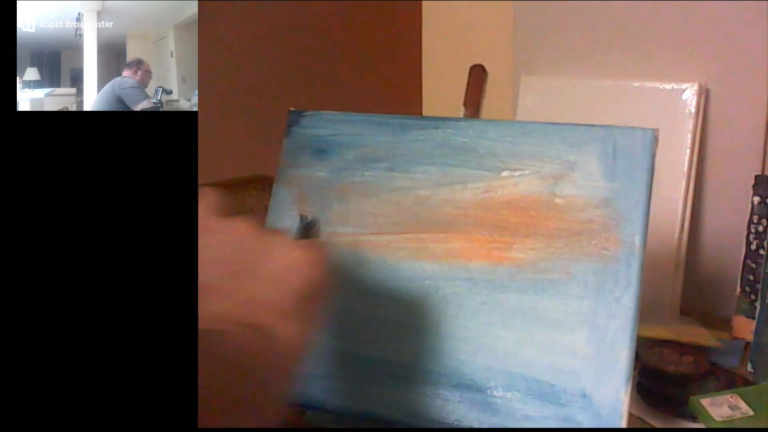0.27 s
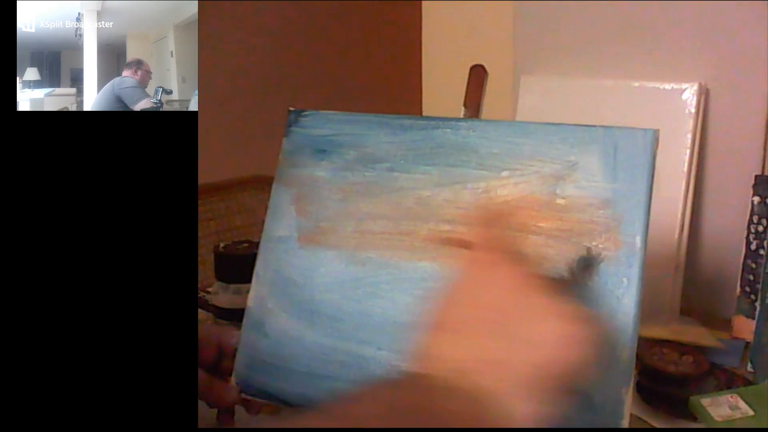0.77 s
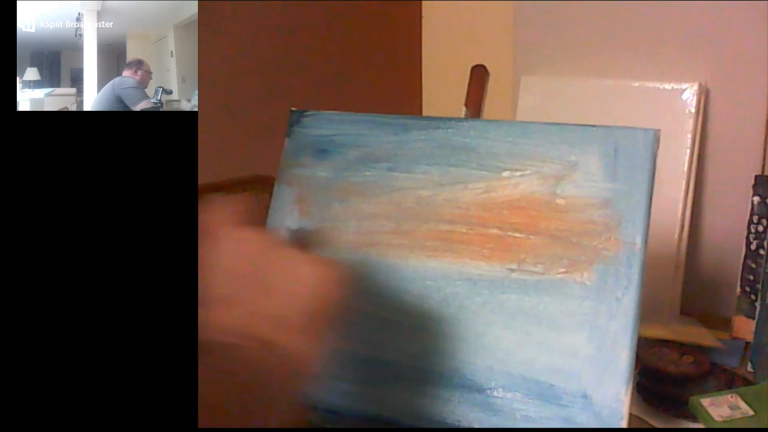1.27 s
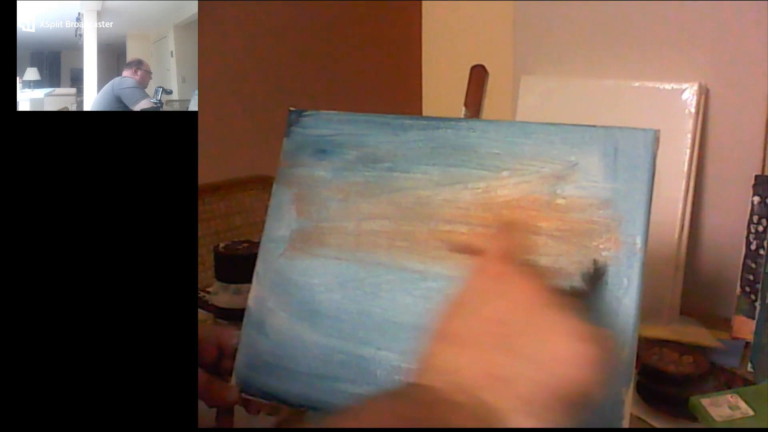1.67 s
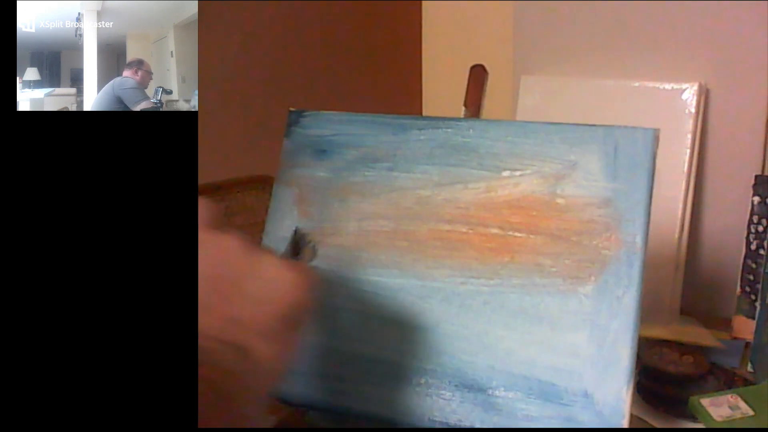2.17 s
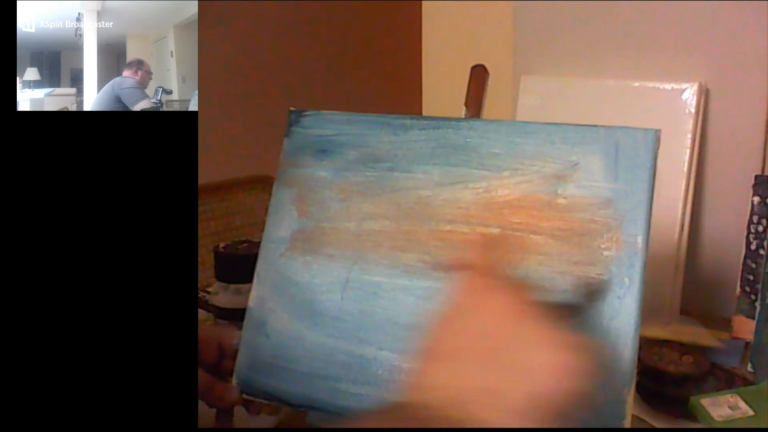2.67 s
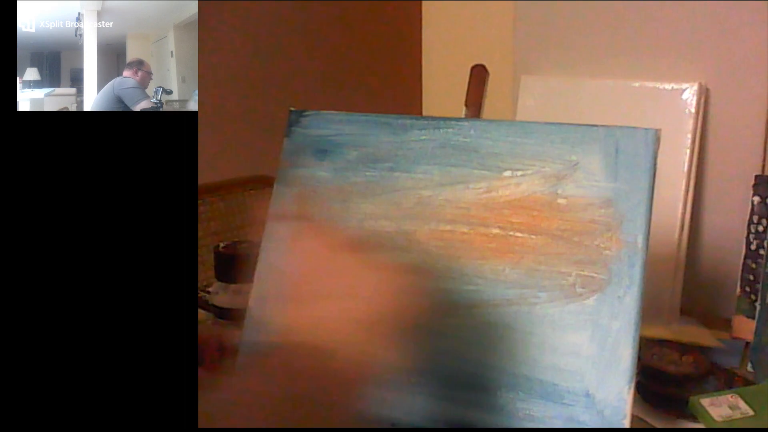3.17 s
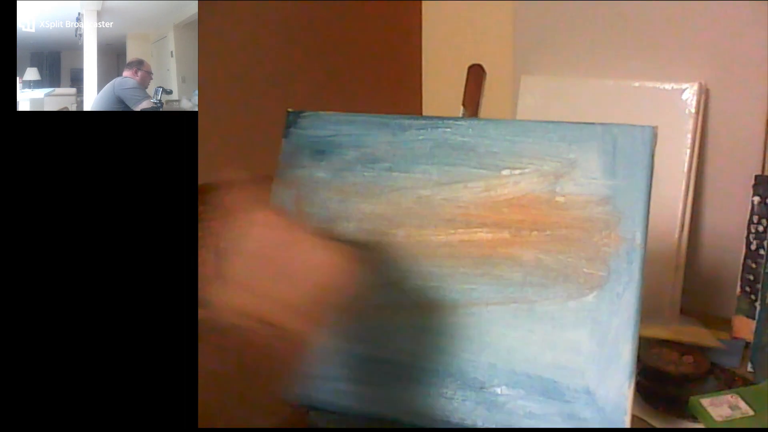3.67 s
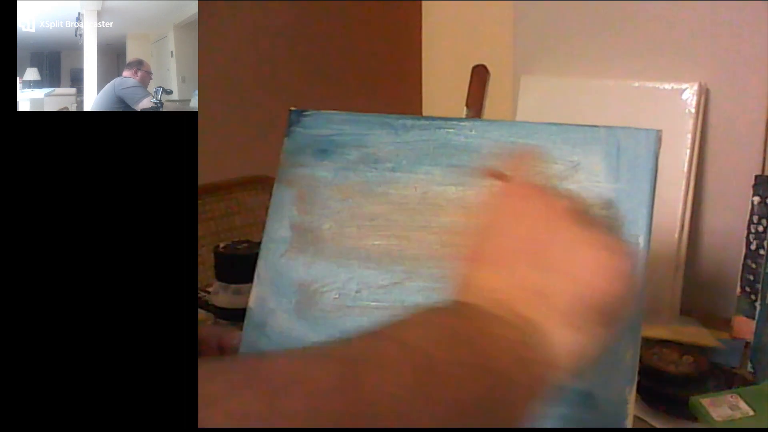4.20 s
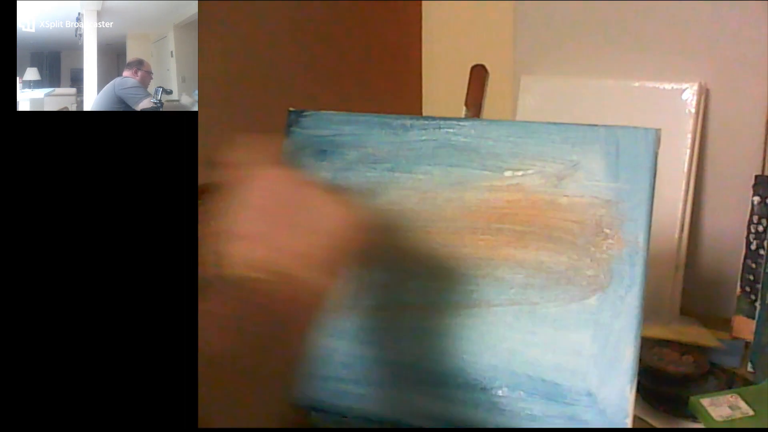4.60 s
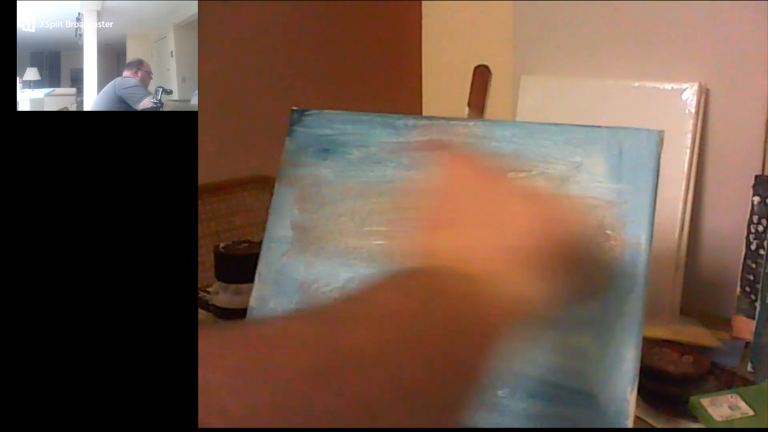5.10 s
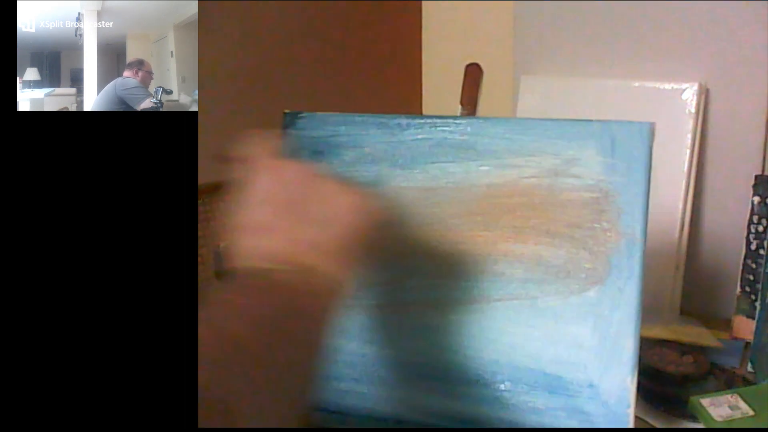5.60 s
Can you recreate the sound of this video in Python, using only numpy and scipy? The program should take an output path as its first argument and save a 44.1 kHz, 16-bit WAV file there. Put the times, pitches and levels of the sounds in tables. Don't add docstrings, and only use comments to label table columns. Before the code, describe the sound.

Sixteen or so uneven bristly swishes follow one another for six seconds, stronger and weaker strokes roughly alternating. Crackly bristle ticks rasp the weave, while the canvas resonates quietly like a slack drum. Small bumps open the scene, a cluster of taps and brief dabs comes midway, and later strokes start with light clicks. The pickup is close, with little bass, low hiss, a small dry room and momentary watery thinning.

```python
import sys
import numpy as np
from scipy import signal
from scipy.fft import rfft, irfft, next_fast_len
from scipy.io import wavfile
from scipy.ndimage import uniform_filter1d, map_coordinates

SR = 44100
rng = np.random.default_rng(int(sys.argv[2]) if len(sys.argv) > 2 else 0)


def wav_out(sig):
    wavfile.write(sys.argv[1], SR, np.round(np.clip(np.atleast_2d(sig).T, -1, 1) * 32767).astype(np.int16))


def gain_from_db(level_db):
    decades = np.asarray(level_db, float) / 20
    return 10 ** decades


N = 257984

# (centre [Hz], width [Hz], level [dB])
WEAVE_MODES = [(773, 76, -4), (866, 72, -1.5), (1056, 160, -5.5), (1199, 30.3, 0), (1450, 270, -3)]
# (centre [Hz], width [Hz], level [dB])
THREAD_MODES = [(1783, 247, -7), (2533, 207, -1.5), (2697, 205, -0.5), (3340, 384, -1)]
# (splayed tips [dB], drag on weave [dB], load on drum [dB], shove of frame [dB])
HAND_GRIP = [(1, 0, 0, 6), (4, 5, 7, 5), (1, 1, -3, -8), (1, 3, 9, 7), (8, -4, 0, 8), (1, -1, 0, -6),
             (0, 1, 5, 8), (-8, 12, 15, 18), (1, 1, 2, 5), (6, 1, 0, -5), (1, 2, 0, -8), (-2, 1, -4, -4),
             (-3, 2, -10, -8), (-3, 0, -4, 5), (-2, -1, -8, 2), (-8, -4, -2, 1)]


def unit(x):
    return x / np.sqrt(np.mean(x ** 2) + 1e-20)


def along(points, hz):
    f, v = np.transpose(points)
    return np.interp(np.log(hz + 1), np.log(f + 1), v)


def wobble(rate_hz):
    knots = rng.standard_normal(int(N * rate_hz / SR) + 4)
    return map_coordinates(knots, [np.arange(N) * rate_hz / SR])


def filtered(x, response):
    size = next_fast_len(N + SR // 2)
    return irfft(rfft(x, size) * response(np.fft.rfftfreq(size, 1 / SR)), size)[:N]


def modes(table):
    def response(f):
        total = 0
        for k, (centre, width, db) in enumerate(table):
            total = total + (-1) ** k * gain_from_db(db) * 1j * f * width / (centre ** 2 - f * f + 1j * f * width)
        return total
    return response


def banded_modes(table, centre_hz, width_hz):
    return lambda hz: modes(table)(hz) * modes([(centre_hz, width_hz, 0)])(hz)


def patchy(x, depth_db, bins, frames):
    z = signal.stft(x, nperseg=512)[2]
    field = uniform_filter1d(rng.standard_normal(z.shape), bins, 0)
    field = uniform_filter1d(field, frames, 1)
    return unit(signal.istft(z * gain_from_db(depth_db * unit(field)), nperseg=512)[1][:N])


def catches(per_s, spread_db, share):
    when, sign, size = rng.random((3, N))
    ticks = (when < per_s / SR) * np.sign(sign - .5) * gain_from_db(-spread_db * np.log(1 - size))
    return np.sqrt(share) * unit(ticks) + np.sqrt(1 - share) * rng.standard_normal(N)


def motion(layer, grip_db=0, rest_db=-60):
    # (bristles grip [s], time to fastest [s], fastest to lift-off [s], peak sizzle [dB])
    strokes = [(.175, .09, .17, -27), (.595, .12, .175, -22), (1.1, .17, .11, -30), (1.565, .12, .15, -21),
               (1.987, .02, .02, -48), (2.075, .19, .065, -27), (2.467, .115, .14, -24),
               (2.8, .06, .015, -42), (2.893, .15, .12, -23), (3.325, .03, .05, -34),
               (3.405, .04, .11, -27), (3.757, .18, .105, -21), (4.19, .19, .08, -28),
               (4.678, .25, .09, -21), (5.115, .15, .17, -28), (5.65, .14, .1, -24)]
    # (level [dB], share of swell, lead [s], lag [s], attack [dB/s], release [dB/s])
    follow = dict(sizzle=(0.1, 1.01, .001, .001, 900, 500), tips=(-16, .6, .003, -.005, 800, 600),
              threads=(-8, .85, .003, .008, 900, 500), weave=(-10, .6, .012, .02, 700, 450),
              drum=(-17, .45, .015, .03, 500, 500), sway=(-27, .3, .03, .04, 400, 400))
    # (time [s], sizzle level [dB])
    resting = [(0, -55), (.03, -66), (.15, -53), (.44, -60), (.53, -70), (.97, -62), (1.06, -54),
               (1.47, -53), (1.93, -72), (2.04, -53), (2.4, -64), (2.77, -62), (3.22, -53), (3.68, -58),
               (4.13, -64), (4.6, -72), (5.07, -37), (5.53, -57)]
    land_db, lift_db, least_swell_db = -34, -38, 3.5
    rise_bend, fall_bend = 1.6, 1.9

    layer_db, share, lead_s, lag_s, attack, release = follow[layer]
    start, rise, fall, peak = np.transpose(strokes)[..., None]
    t = np.arange(0, N / SR, .002)
    fastest = start + rise
    rise = rise + lead_s
    fall = np.maximum(fall + lag_s, .005)
    land = np.minimum(land_db, peak - least_swell_db)
    lift = np.minimum(lift_db, peak - least_swell_db)
    before = np.maximum(fastest - t, 0)
    after = np.maximum(t - fastest, 0)
    dome = peak - (peak - land) * np.minimum(before / rise, 1) ** rise_bend
    dome = dome - (peak - lift) * np.minimum(after / fall, 1) ** fall_bend
    edges = attack * np.maximum(before - rise, 0) + release * np.maximum(after - fall, 0)
    level = land + share * (dome - land) - edges + layer_db + np.reshape(grip_db, (-1, 1))
    rest = np.interp(t, *np.transpose(resting)) + rest_db
    power = np.sum(gain_from_db(2 * level), axis=0) + gain_from_db(2 * rest)
    return np.interp(np.arange(N) / SR, t, np.sqrt(power))


def room():
    # (frequency [Hz], density [dB/Hz])
    hiss = [(40, -38), (100, -28), (150, 1), (230, -13), (330, -12), (540, -15), (1140, -16.5),
            (1690, -16.5), (2290, -19), (3500, -12), (4720, -7), (6000, -17.5), (8380, -35), (15600, -42)]
    return gain_from_db(-63) * unit(filtered(rng.standard_normal(N), lambda hz: gain_from_db(along(hiss, hz))))


def walls(x):
    # (frequency [Hz], t60 [s])
    decay = [(200, 0.16), (2000, 0.15), (5000, 0.21), (12000, 0.079)]
    hz, t, z = signal.stft(rng.standard_normal(SR // 2), SR, nperseg=256)
    tail = signal.istft(z * gain_from_db(-60 * t / along(decay, hz)[:, None]), SR, nperseg=256)[1]
    delayed = np.pad(x, (300, 0))
    return signal.fftconvolve(delayed, tail / np.linalg.norm(tail))[:N]


def knocks():
    # (time [s], peak level [dB], pitch [Hz], t60 [s])
    landings = [(0.005, -46, 400, 0.057), (0.057, -43, 252, 0.087), (0.079, -26.5, 215, 0.053),
                (0.111, -25.5, 229, 0.042), (1.599, -40.5, 371, 0.13), (2.044, -38.5, 440, 0.077),
                (2.782, -46, 168, 0.091), (2.854, -31, 220, 0.038), (3.072, -40.5, 350, 0.055),
                (3.187, -41, 170, 0.05), (3.238, -41, 185, 0.046), (4.074, -46, 248, 0.062),
                (4.586, -43, 227, 0.06), (4.85, -34, 350, 0.043), (5.128, -40, 209, 0.058)]
    out, t = np.zeros(N + SR), np.arange(SR // 5) / SR
    for s, db, hz, t60 in landings:
        ring = np.sin(2 * np.pi * hz * t) + 0.3 * np.sin(2 * np.pi * 1.82 * hz * t)
        soft_onset = 1 - np.exp(-t / 0.0035)
        out[round(s * SR):][:len(t)] += gain_from_db(db + 5.5 - 60 * t / t60) * ring * soft_onset
    return out[:N]


def taps():
    # (time [s], peak level [dB], top level [dB], ringing [Hz], t60 [s])
    ticks = [(0.06, -51, -8, 980, 0.036), (0.077, -49, -4, 1490, 0.033), (0.11, -48, 0, 894, 0.04),
             (1.99, -46, 2, 970, 0.058), (2.046, -32, -5, 950, 0.054), (2.473, -33.5, 13, 826, 0.073),
             (2.789, -35.5, -8, 950, 0.073), (2.831, -32.5, -21, 1000, 0.047),
             (2.856, -21.5, -25, 967, 0.053), (2.897, -26.5, -14, 995, 0.04), (3.761, -34, -9, 1490, 0.04),
             (4.194, -30, -2, 1540, 0.079), (4.576, -52, 11, 1410, 0.03), (4.636, -29, -48, 1240, 0.04),
             (4.653, -31.5, -8, 960, 0.02), (4.684, -29, 3, 840, 0.032), (5.049, -38.5, 14, 866, 0.089),
             (5.121, -42, -7, 1500, 0.044), (5.598, -40.5, -6, 1510, 0.051),
             (5.649, -30.5, -8, 1450, 0.045)]
    body, ring, top = np.zeros((3, N + SR))
    t = np.arange(SR // 10) / SR
    for s, db, top_db, hz, t60 in ticks:
        burst = rng.standard_normal(len(t))
        span = slice(round(s * SR), round(s * SR) + len(t))
        body[span] += gain_from_db(db + 15 - 60 * t / 0.0036) * burst
        tone = np.sin(2 * np.pi * hz * t) * (1 - np.exp(-t / 0.0016))
        ring[span] += gain_from_db(db - 3 - 60 * t / t60) * tone
        top[span] += gain_from_db(db + top_db + 1.5 - 60 * t / t60) * burst * (1 - np.exp(-t / .0006))
    spit = filtered(top[:N], lambda hz: modes([(4800, 2600, 0)])(hz) ** 3)

    def soft(hz):
        return modes(WEAVE_MODES + THREAD_MODES)(hz) / (1 + 1j * hz / 4500) ** 2
    return filtered(body[:N], soft) + ring[:N] + spit


def canvas():
    # (centre [Hz], width [Hz], level [dB])
    sway_modes = [(75, 48, -19), (157.5, 40, -10), (237.2, 29.6, -3)]
    # (centre [Hz], width [Hz], level [dB])
    drum_modes = [(362.5, 47, -2), (427, 50.4, -2), (588, 62, -2)]
    load_db, shove_db = np.transpose(HAND_GRIP)[2:]
    shoves = catches(per_s=70, spread_db=3.5, share=0.46) * gain_from_db(0.83 * wobble(25))
    sway = unit(filtered(shoves, banded_modes(sway_modes, 200, 220)))
    nudges = catches(per_s=150, spread_db=2.1, share=0.44) * gain_from_db(1.9 * wobble(30))
    drum = filtered(nudges, banded_modes(drum_modes, 460, 400))
    drum = patchy(drum, 2.9, bins=2, frames=8)
    return motion("sway", shove_db + 5.5) * sway + motion("drum", load_db) * drum


def brush():
    # (frequency [Hz], density [dB/Hz])
    sizzle_spectrum = [(2180, -31.5), (3700, -9), (4640, 3), (5220, 0), (5960, -11), (8500, -32),
                       (11000, -40), (18700, -120)]
    # (frequency [Hz], density [dB/Hz])
    tip_spectrum = [(4120, -44), (7000, -0.5), (7770, -4), (9130, -8), (14800, -22), (15600, -20)]
    splay_db, drag_db = np.transpose(HAND_GRIP)[:2]
    flutter_db = .35 * wobble(45) + .85 * wobble(180)
    slips = catches(per_s=4000, spread_db=1.5, share=.3) * gain_from_db(flutter_db)
    tugs = catches(per_s=900, spread_db=1.5, share=.35) * gain_from_db(1.2 * flutter_db)

    sizzle = filtered(slips, lambda hz: gain_from_db(along(sizzle_spectrum, hz)))
    sizzle = patchy(sizzle, 1.8, bins=5, frames=7)
    tips = filtered(slips, lambda hz: gain_from_db(along(tip_spectrum, hz)))
    tips = patchy(tips, 3.0, bins=16, frames=10)
    scratch = filtered(slips + .6 * tugs, banded_modes(THREAD_MODES, 2500, 2200))
    scratch = patchy(scratch, 3.0, bins=3, frames=10)
    rasp = filtered(.6 * slips + tugs, banded_modes(WEAVE_MODES, 1100, 1200))
    rasp = patchy(rasp, 3.4, bins=2, frames=10)

    airborne = motion("sizzle", rest_db=0) * sizzle + motion("tips", splay_db, rest_db=-23) * tips
    threads = motion("threads", .45 * drag_db, rest_db=-17) * scratch
    return airborne + threads + motion("weave", drag_db, rest_db=-22) * rasp


def scene():
    near = brush() + canvas() + knocks() + taps()
    return (near + gain_from_db(-17.5) * walls(near) + room())[None]


def thin_frames(x, count):
    thinned = [0, 9, 19, 26, 54, 56, 64, 68, 69, 81, 84, 92, 102, 109, 111, 119, 159, 163, 189, 271]
    # (frequency [Hz], favour [dB])
    favoured = [(400, 6), (800, -4), (2000, -3), (2600, 5), (3300, -4), (4800, 4), (5800, -5), (6400, 5)]
    frame_s, first_s = 1024 / 48000, .0112
    size = round(frame_s * SR)
    n, line = np.arange(2 * size) + .5, np.arange(size) + .5
    hz = line * SR / (2 * size)
    rise = np.sin(np.pi * n / (2 * size)) ** 2
    window = np.sin(np.pi / 2 * (.35 * rise + .65 * n.clip(max=2 * size - n) / size))
    basis = np.sqrt(2 / size) * window * np.cos(np.pi / size * np.outer(line, n + size / 2))
    padded = np.pad(x, size)
    out = padded.copy()
    for k in thinned:
        start = round((first_s + k * frame_s) * SR)
        luck_db = np.repeat(rng.normal(0, 4, size // 10 + 1), 10)[:size]
        favour = gain_from_db(luck_db + along(favoured, hz))
        z = basis @ padded[start:start + 2 * size]
        worth = abs(z) / uniform_filter1d(abs(z), size=40) ** .7 * favour * (hz < 7200)
        kept = z * (worth >= np.sort(worth)[-count]) * gain_from_db(2.5)
        out[start:start + 2 * size] += (kept - z) @ basis
    return out[size:-size]


def band_limit(x):
    return signal.sosfilt(signal.butter(12, 15790, fs=SR, output="sos"), x)


def record(dry):
    bass_cut = filtered(dry[0], lambda hz: (1j * hz / (140 + 1j * hz)) ** 3)
    mix = thin_frames(bass_cut, count=36)[None]
    return band_limit(mix)


dry = scene()
out = record(dry)
wav_out(out)
```